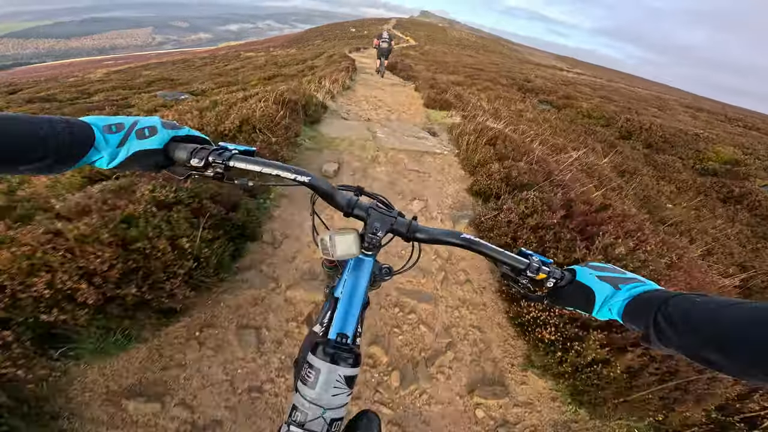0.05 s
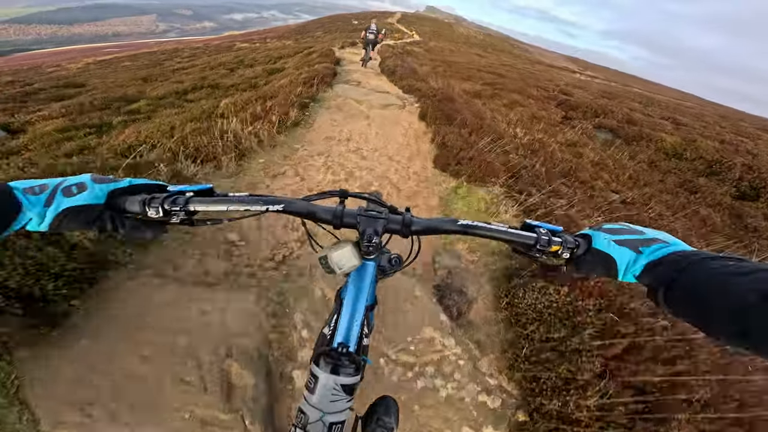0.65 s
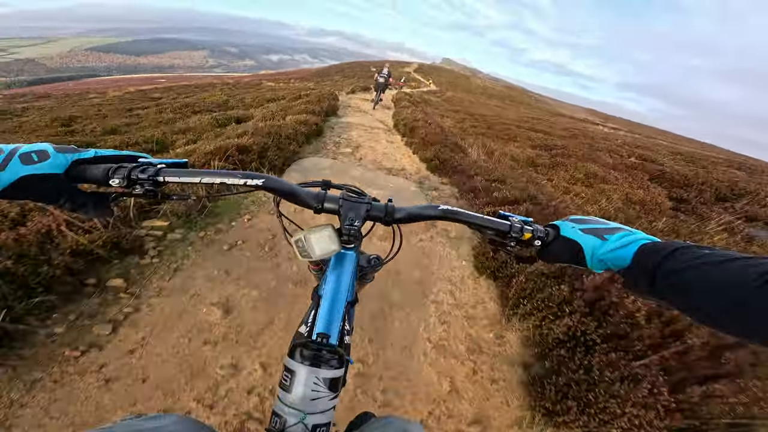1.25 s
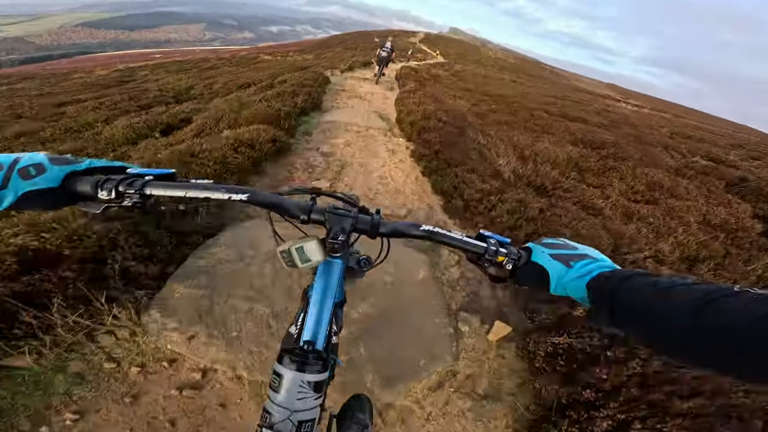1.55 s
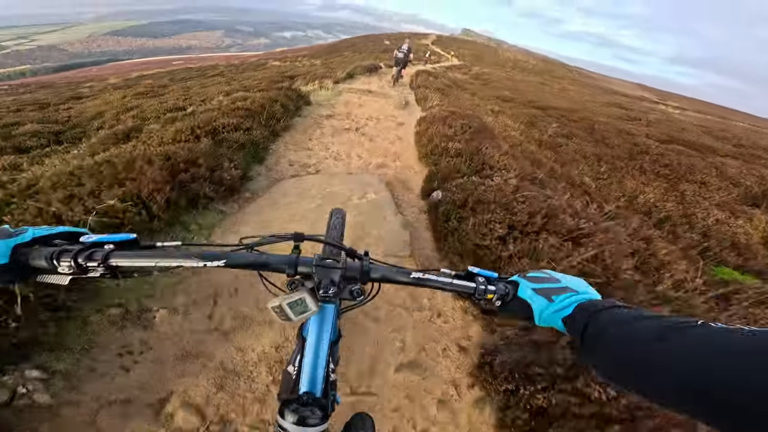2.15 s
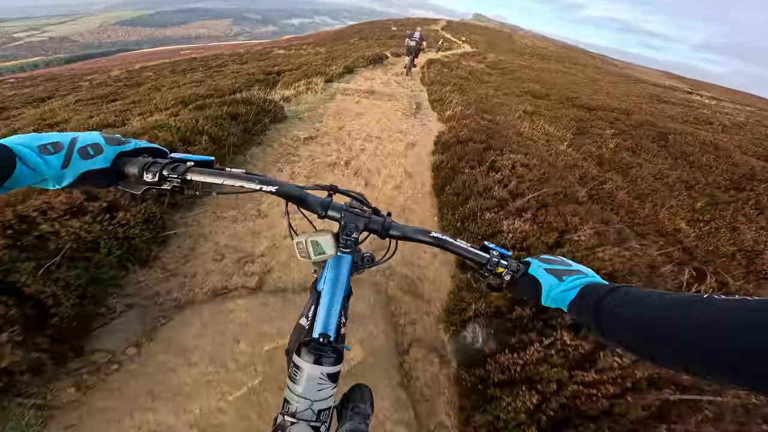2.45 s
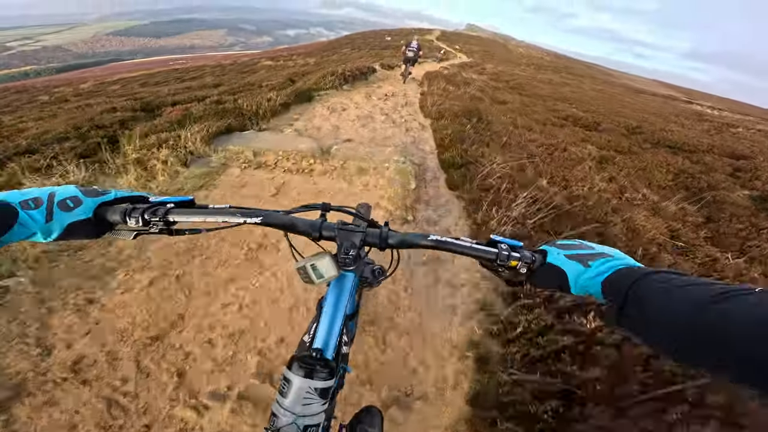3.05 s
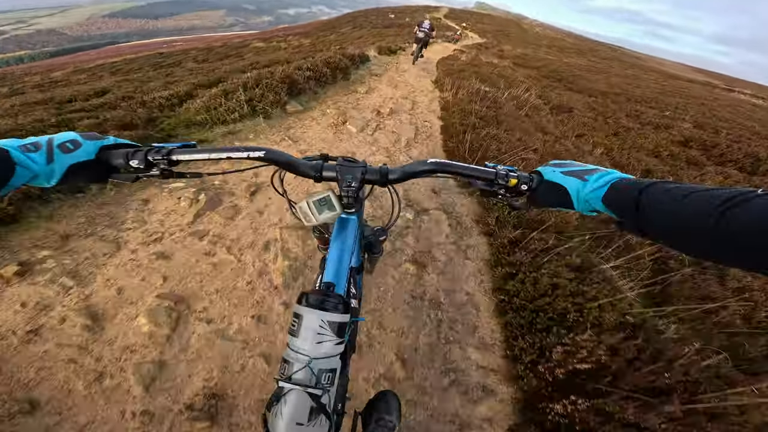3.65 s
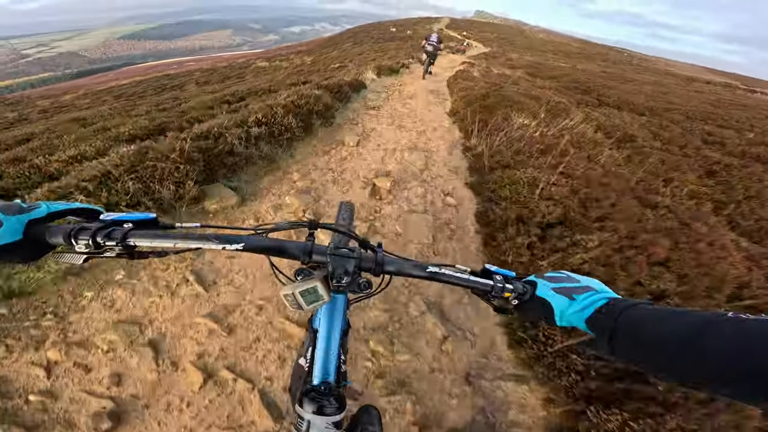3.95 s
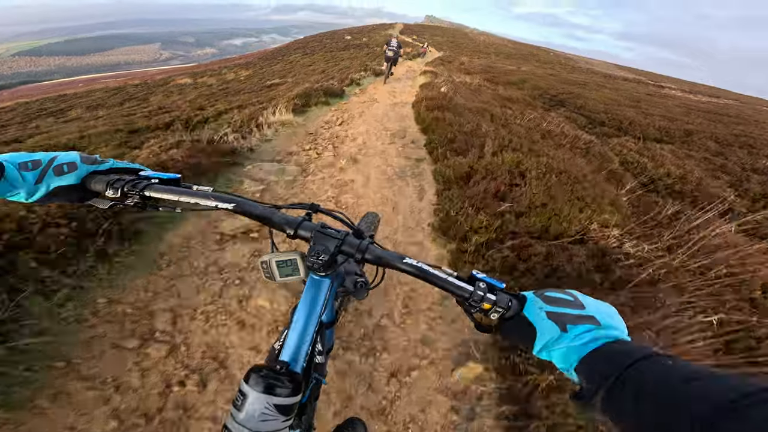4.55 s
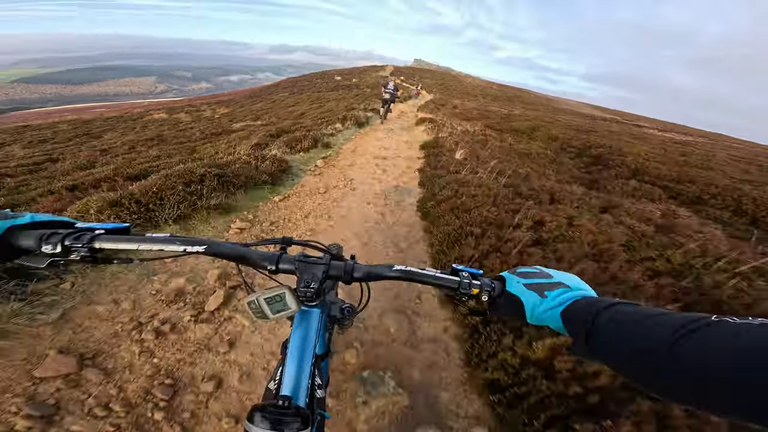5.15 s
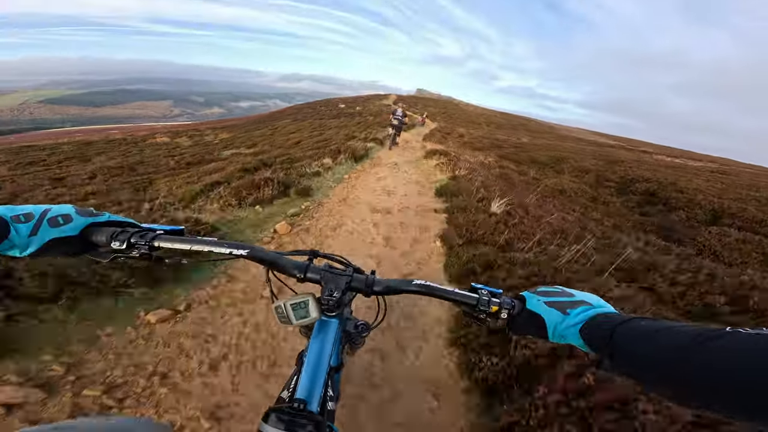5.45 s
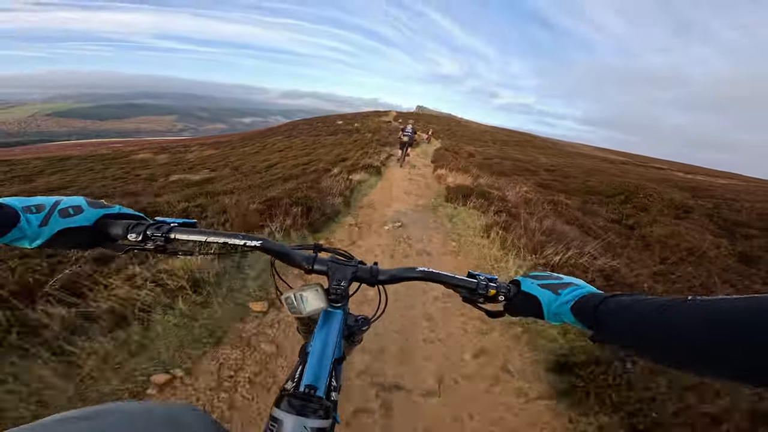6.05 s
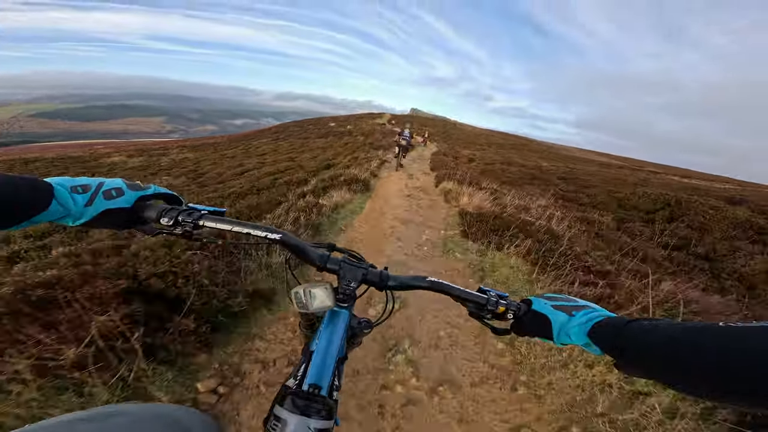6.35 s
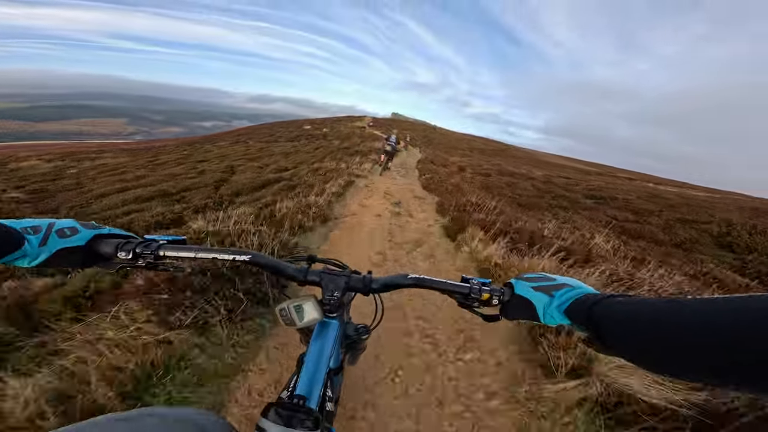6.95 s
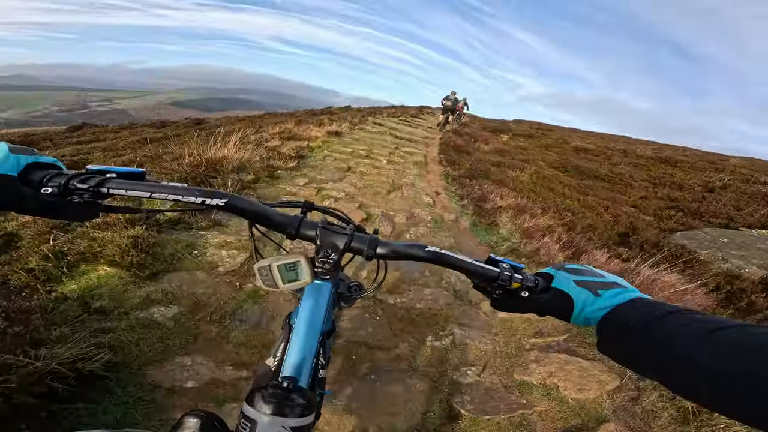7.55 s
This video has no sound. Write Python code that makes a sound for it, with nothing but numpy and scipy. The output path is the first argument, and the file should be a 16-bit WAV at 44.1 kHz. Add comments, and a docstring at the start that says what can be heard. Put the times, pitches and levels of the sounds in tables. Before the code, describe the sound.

Wind buffets the microphone as bicycle tyres roar over gravel and knock against rocks, the chain clattering and the freewheel buzzing near the end.

```python
"""A mountain bike rolls fast along a stony moorland trail, heard from the rider's chest.
Its tyres roar as the tread drums on the ground, and grit cracks beneath them, while turbulent
wind buffets the microphone. Impacts excite the bike's resonances: rocks knock against the wheels,
the chain clatters and cables rap the hollow frame. Near the end the freewheel's pawls buzz."""
import sys
import numpy as np
from scipy import signal
from scipy.fft import rfft, irfft, next_fast_len
from scipy.io import wavfile
from scipy.ndimage import uniform_filter1d

SR = 44100
rng = np.random.default_rng(int(sys.argv[2]) if len(sys.argv) > 2 else 0)


def dump_mix(stems):
    """Bounce the given channels to the path in sys.argv[1] as a 16-bit WAV at rate SR."""
    frames = np.atleast_2d(stems).T  # one column per channel
    limited = np.clip(frames, -1, 1)  # hard clip at full scale
    pcm = np.round(limited * 32767).astype(np.int16)
    wavfile.write(sys.argv[1], SR, pcm)


N = 343450
TIME = np.arange(N) / SR
HIT_SIZE = SR // 12
HIT_AGE = np.arange(HIT_SIZE) / SR
DIRT_ROAR_DB, DIRT_GRIT_DB = -39, -51

# stony stretches, levels over packed dirt: start_s, length_s, roar_db, grit_db
STONY_STRETCHES = [(0.0, 0.2, 7.5, 9.5), (0.251, 0.6, 4, 5.5), (0.885, 0.12, 5.5, 10),
                   (1.103, 0.08, 8, 12.5), (1.252, 0.23, 7, 4.5), (1.713, 0.23, 5, 11), (2.087, 0.13, 5, 7),
                   (2.472, 0.1, 1.5, 8.5), (2.613, 0.12, 6.5, 11), (2.861, 0.092, 9.5, 10),
                   (3.05, 0.08, 3, 3.5), (3.638, 0.05, 8, 7), (3.81, 0.12, 12.5, 11.5),
                   (4.012, 0.1, 5.5, 4.5), (4.241, 0.55, 6.5, 8), (4.84, 0.23, 5.5, 7.5),
                   (5.195, 0.25, 5, 3.5), (5.547, 0.35, 1.5, -10), (6.235, 0.08, 4.5, 5.5),
                   (6.359, 0.26, 7.5, 6.5), (7.291, 0.2, 1.5, 4.5), (7.547, 0.22, 3.5, 4)]
# resonances of the wheel and of the frame: pitch_hz, width_hz, gain_db
WHEEL_MODES = [(380, 230, -11), (514, 200, 1.5), (630, 140, 0), (963, 76, 10.5), (1243, 195, 8.5),
               (1617, 120, 6), (1890, 490, -1.5), (2930, 980, -2)]
FRAME_MODES = [(416, 95, 5), (520, 66, 8.5), (643, 37, 7.5), (960, 36, 6), (1220, 31, -1), (1540, 74, -1),
               (1800, 61, -15), (2770, 210, -1), (3000, 58, -12), (3460, 270, -10)]


def from_db(db):
    """Decibels to amplitude ratio."""
    return 10 ** (np.asarray(db) / 20)


def unit_power(x):
    """Normalise to a mean square of one."""
    return x / np.sqrt(np.mean(x ** 2) + 1e-20)


def steady(pair, span_s):
    """Hold a pair of noises at unit power over a sliding span."""
    return pair / np.sqrt(uniform_filter1d(pair ** 2, max(int(span_s * SR), 2)) + 1e-12)


def curves(rows):
    """Interpolate rows of (time_s, values...) at every sample."""
    times, *columns = np.transpose(rows)
    return [np.interp(TIME, times, column) for column in columns]


def swells(rows, rise_s, fall_s):
    """Upper envelope of trapezoids given as (start_s, length_s, height)."""
    return np.max([np.interp(TIME, [s - rise_s, s, s + length, s + length + fall_s], [0, top, top, 0])
                   for s, length, top in rows], axis=0)


def drift(corner_hz):
    """Low-passed noise of unit power: a smooth random fluctuation."""
    hop, settle = 40, 2000
    pole = np.exp(-2 * np.pi * corner_hz * hop / SR)
    noise = rng.standard_normal(N // hop + settle + 2)
    slow = signal.lfilter([1], [1, -2 * pole, pole * pole], noise)[settle:]
    return np.interp(np.arange(N) / hop, np.arange(len(slow)), unit_power(slow))


def colour(x, spectrum, power=1):
    """Minimum-phase filter whose gain is a spectrum of (frequency_hz, gain_db), raised to a power."""
    size = 2 ** 15
    hz, db = np.transpose(spectrum)
    grid_hz = np.maximum(np.arange(size // 2 + 1) * SR / size, 1)
    gain = from_db(power * np.interp(np.log(grid_hz), np.log(hz), db))
    cepstrum = irfft(np.log(gain))
    cepstrum[1:size // 2] *= 2  # folding the cepstrum makes the filter causal
    cepstrum[size // 2 + 1:] = 0
    response = irfft(np.exp(rfft(cepstrum)))[:size // 2]
    padded = next_fast_len(N + size // 2, real=True)
    return irfft(rfft(x, padded) * rfft(response, padded), padded)[..., :N]


def resonate(x, modes, scatter_db=0):
    """Modal superposition: damped resonances whose strengths vary with the point of contact."""
    out = 0
    for k, (hz, width, db) in enumerate(modes):
        r = np.exp(-np.pi * width / SR)
        band = signal.lfilter([1, 0, -1], [1, -2 * r * np.cos(2 * np.pi * hz / SR), r * r], x)
        gain = from_db(db + scatter_db * rng.standard_normal())
        out = out + (-1) ** k * (1 - r * r) * gain * band
    return out


def tuned(modes, hz):
    """Scale modes of (pitch_ratio, width_share, gain_db) to a pitch."""
    return [(ratio * hz, share * ratio * hz, db) for ratio, share, db in modes]


def soften(x, hz):
    """Compliance: rubber spreads a contact in time, acting as a low-pass filter."""
    return signal.sosfilt(signal.butter(2, hz, fs=SR, output="sos"), x)


def grains(per_s, spread_db):
    """Poisson impacts as a pair of click trains: many small stones, a few large."""
    at = np.flatnonzero(rng.random(N) < per_s / SR)
    sizes = from_db(spread_db * np.minimum(rng.exponential(1, (2, len(at))), 4))
    clicks = np.full((2, N), 1e-18)
    clicks[:, at] = sizes * rng.choice([-1, 1], sizes.shape)
    return clicks


def strike(modes, t60, crush, scatter_db):
    """Impact excitation: an impulse and a dying crush of contacts drive the modes; peak power is one."""
    contacts = rng.laplace(0, 1, (2, HIT_SIZE))
    force = crush * contacts * from_db(-60 * HIT_AGE / t60)
    force[:, 0] += [1, rng.choice([-1, 1])]
    sound = resonate(force + 1e-18, modes, scatter_db)
    power = uniform_filter1d(sound ** 2, size=66, mode="constant")
    return sound / np.sqrt(power.max(axis=1, keepdims=True))


def add(track, s, sound):
    """Superpose a sound on the track at s seconds."""
    at = int(s * SR)
    track[:, at:at + sound.shape[1]] += sound[:, :N - at]


def wind(gust_midpoint_db=-25, gust_range_db=14):
    """Turbulence: large eddies rumble; small ones break on the microphone ports in quick lumps."""
    # strength of the headwind's rumble: time_s, level_db
    headwind = [(0, -25.5), (0.6, -22), (1.25, -23), (1.9, -20.5), (2.5, -27.5), (2.72, -18), (3.15, -27),
                (3.65, -20), (4.7, -25), (5.0, -21.5), (5.35, -22), (6.0, -25.5), (6.4, -25.5),
                (7.2, -25.5), (7.45, -21), (7.79, -28.5)]
    # gusts over the light buffeting: start_s, length_s, rise_db
    gusts = [(0.07, 0.14, 11), (0.3, 0.29, 8), (0.405, 0.025, 11), (0.515, 0.03, 11.5), (0.78, 0.1, 6.5),
             (1.63, 0.057, 3.5), (2.08, 0.12, 6), (2.74, 0.15, 5.5), (3.12, 0.018, 6), (3.76, 0.12, 10.5),
             (4.19, 0.72, 4), (4.8, 0.31, 9.5), (5.72, 0.066, 5), (6.55, 0.21, 3.5), (7.32, 0.065, 8),
             (7.67, 0.03, 8.5)]
    # moments of stiller air: start_s, length_s
    lulls = [(1.188, 0.19), (1.99, 0.015), (5.438, 0.05), (5.953, 0.097), (7.09, 0.064)]
    # spectra of large eddies, light buffeting and strong gusts: frequency_hz, density_db
    rumble_spectrum = [(8, -25.5), (18, -2.5), (32, 2.5), (50, -4), (80, -3.5), (120, -20), (250, -64.5),
                       (600, -68)]
    light_spectrum = [(45, -26), (80, -2.5), (110, 0), (160, -3), (230, -7), (320, -9.5), (480, -18.5),
                      (800, -35.5), (2000, -72.5), (6000, -99)]
    gust_spectrum = [(60, -23.5), (105, 3), (150, -0.5), (240, -4), (330, -11.5), (480, -19), (800, -30.5),
                     (2000, -69.5), (6000, -69)]
    headwind_db, = curves(headwind)
    lull_db = -10 * swells([(s, length, 1) for s, length in lulls], rise_s=0.026, fall_s=0.026)
    rumble_db = headwind_db + .5 * lull_db + 2 * drift(5.1)
    light_db = -32.5 + 0.48 * (headwind_db - headwind_db.mean())
    buffet_db = light_db + swells(gusts, rise_s=0.097, fall_s=0.094) + lull_db + 1.5 * drift(15.6)
    rumble = steady(colour(rng.standard_normal((2, N)), rumble_spectrum), span_s=0.108)
    light_noise, gust_noise = rng.standard_normal((2, 2, N)) * from_db(drift(21))
    gust_share = np.clip(.5 + (buffet_db - gust_midpoint_db) / gust_range_db, .05, .95)
    light = np.sqrt(1 - gust_share) * unit_power(colour(light_noise, light_spectrum))
    strong = np.sqrt(gust_share) * unit_power(colour(gust_noise, gust_spectrum))
    buffet = steady(light + strong, span_s=0.11)
    return rumble * from_db(rumble_db - 0.5) + buffet * from_db(buffet_db - 0.6)


def ground(rise_s=0.087, fall_s=0.12):
    """Roughness and load set the levels of roar and grit: up on stony stretches, down in a hop."""
    # the tyres go light over a lip: start_s, length_s
    hops = [(1.52, 0.014), (2.34, 0.076)]
    stretches = np.array(STONY_STRETCHES)
    hop_db = -3.5 * swells([(s, length, 1) for s, length in hops], rise_s=0.016, fall_s=0.016)
    roar_db = DIRT_ROAR_DB + swells(stretches[:, [0, 1, 2]], rise_s, fall_s)
    grit_db = DIRT_GRIT_DB + swells(stretches[:, [0, 1, 3]], rise_s, fall_s)
    return roar_db + hop_db, grit_db + .5 * hop_db


def tyres(roar_db, grit_db):
    """Cavity resonance: the drumming tread rings the tyre's air, while grit cracks under it in clumps."""
    # spectra of the tyre and of crushed grit: frequency_hz, density_db
    roar_spectrum = [(100, -31), (200, 9.5), (255, 16), (310, 4), (440, 6.5), (620, 1), (830, -2),
                     (960, 1.5), (1090, -0.5), (1240, 0), (1450, -5.5), (2200, -12.5), (3400, -14.5),
                     (7000, -43)]
    grit_spectrum = [(900, -60), (1800, 2), (2450, -2), (2900, 0), (3450, -0.5), (4200, -4.5), (5200, -5),
                     (6000, -7.5), (7400, -6.5), (8200, -14.5), (9700, -15), (15000, -18)]
    bumps = drift(49)
    tread = unit_power(grains(per_s=2500, spread_db=3))
    roar = steady(colour(tread * from_db(2 * bumps), roar_spectrum), span_s=0.244)
    # loose, loud ground breaks up more unevenly than packed dirt
    looseness = np.clip((grit_db + 60.5) / 15, .2, 1.2)
    cracks = unit_power(crumble(grains(per_s=700, spread_db=4)))
    sand = rng.standard_normal((2, N))
    clumps = from_db(2 * looseness * (1.3 * bumps + 0.15 * drift(130)))
    crunch = unit_power(colour((cracks + sand) * clumps, grit_spectrum))
    ticking = pebbles(low_hz=1100, high_hz=7500, sizes=26, each_per_s=12, width_share=0.066)
    grit = crunch + from_db(-2.5) * looseness * ticking
    return roar * from_db(roar_db) + grit * from_db(grit_db)


def crumble(clicks, t60=0.006, snap_db=1.5):
    """Brittle fracture: each grain snaps, then crumbles in an exponentially decaying burst of noise."""
    fade = from_db(-120 / (t60 * SR))
    power = signal.lfilter([1 - fade], [1, -fade], clicks ** 2)
    return from_db(snap_db) * clicks + np.sqrt(power) * rng.standard_normal(clicks.shape)


def pebbles(low_hz, high_hz, sizes, each_per_s, width_share):
    """Natural frequency depends on size: small stones tick at random, each size at its own pitch."""
    out = 0
    for hz in np.geomspace(low_hz, high_hz, sizes):
        taps = grains(each_per_s, spread_db=2)
        out = out + resonate(taps, [(hz, width_share * hz, 0)]) / hz
    return unit_power(out)


def chips(grit_db):
    """Hard impacts ring high: sharp chips tick on the frame and rims, far more on loose ground."""
    ticking = pebbles(low_hz=3400, high_hz=9000, sizes=14, each_per_s=4, width_share=0.055)
    return ticking * from_db(DIRT_GRIT_DB - 24 + 2.3 * (grit_db - DIRT_GRIT_DB))


def jolts(level_db, spread_db, body_db, decay_s, count):
    """Roughness excitation: small random blows on stony ground, as (time_s, level_db, body_db, decay_s)."""
    start, length = np.transpose(STONY_STRETCHES)[:2]
    ends = np.cumsum(length)
    along = (np.arange(count) + rng.random(count)) / count * ends[-1]
    stretch = np.searchsorted(ends, along)
    times = np.clip(start[stretch] + ends[stretch] - along, 0, TIME[-1])
    strength, tone = np.clip(rng.standard_normal((count, 2)), -2, 2).T
    levels = np.interp(times, TIME, level_db) + spread_db * strength
    bodies = body_db + spread_db * (tone - .5 * strength)
    return [(*row, decay_s) for row in zip(times, levels, bodies)]


def chain_slaps(grit_db, ring_width_hz=170):
    """Impact ringing: links land in a bright burst and excite the frame; on stones the chain rattles."""
    # hard slaps: time_s, level_db, relative_ring_db, rattle_t60_s, ring_hz
    slaps = [(0.1332, -33, -9, 0.019, 3000), (0.185, -31, 1.5, 0.13, 3334), (0.736, -36, 5, 0.012, 3200),
             (0.755, -34.5, 1.5, 0.023, 2770), (1.106, -44.5, 24, 0.012, 2900),
             (1.152, -38, 12, 0.037, 3165), (1.4, -36, 10.5, 0.0061, 2620),
             (1.4205, -29, 7.5, 0.0082, 3020), (1.5875, -33.5, 6, 0.029, 2810),
             (1.5988, -37, 9, 0.0069, 3250), (1.7227, -28, -2.5, 0.0087, 3200),
             (1.8982, -31, -5, 0.015, 3000), (1.994, -37, -1, 0.012, 2970),
             (2.1033, -34.5, 12, 0.017, 2930), (2.1141, -30, 2, 0.12, 2900), (2.161, -25, 0, 0.02, 2740),
             (2.8673, -43, 23, 0.0085, 2900), (2.8935, -31, -5, 0.05, 2950), (2.9214, -29, 0, 0.016, 3060),
             (3.1413, -36.5, 3, 0.06, 3260), (3.1684, -37, -4, 0.011, 2930),
             (3.491, -34.5, -4, 0.017, 3220), (3.6597, -32.5, -1, 0.032, 3070),
             (3.7947, -39.5, 11, 0.023, 3080), (3.8562, -46, 20, 0.011, 2820),
             (3.8803, -29.5, 6.5, 0.032, 2940), (3.94, -28.5, -6, 0.023, 2970),
             (4.0471, -19, -9, 0.026, 3000), (4.0547, -22.5, -18, 0.012, 2950),
             (4.289, -30, 4.5, 0.02, 2820), (4.3407, -30, 3, 0.034, 2900), (4.389, -33, 0, 0.034, 2950),
             (4.444, -39, 11, 0.023, 2950), (4.4648, -30, 2, 0.016, 3100), (4.6423, -30.5, 1, 0.025, 2800),
             (4.71, -37, 4, 0.012, 3020), (4.7373, -32.5, -3, 0.027, 2970), (4.8433, -35, 3, 0.0057, 3420),
             (5.045, -34, 4, 0.09, 3230), (6.3935, -26.5, -7, 0.0038, 3180), (6.447, -35, 5.5, 0.011, 3350),
             (6.574, -37, 2, 0.027, 2980), (6.584, -33, 0, 0.017, 3370), (6.6, -36, 7, 0.01, 3450),
             (6.6185, -33.5, 5.5, 0.027, 3050)]
    # resonances of the chain: pitch_hz, width_hz, gain_db
    chain_modes = [(4310, 610, -4.5), (5050, 370, 2.5), (5900, 880, 0), (7330, 840, -1.5),
                   (9040, 670, -7.5), (9040, 990, -4.5), (12700, 4000, -17)]
    out = np.zeros((2, N))
    rattle = jolts(grit_db - 3.5, spread_db=1, body_db=12, decay_s=0.0075, count=70)
    # the frame's pitch varies with where the chain lands
    rattle = [(*row, 2786 * np.exp(0.27 * rng.standard_normal())) for row in rattle]
    for s, db, ring_db, t60, hz in list(slaps) + rattle:
        ring_modes = [(0.623 * hz, 2 * ring_width_hz, -9), (hz, ring_width_hz, 0),
                      (1.17 * hz, 2 * ring_width_hz, -9)]
        links = strike(chain_modes, t60, crush=.4, scatter_db=1.8)
        ring = soften(strike(ring_modes, t60, crush=.12, scatter_db=2), hz=5500)
        add(out, s, from_db(db) * (links + from_db(ring_db + 2) * ring))
    return out


def rock_knocks(roar_db):
    """Modal response: a rock cracks on the wheel and thumps the tyre; long contacts crush more gravel."""
    # rocks against tyre and rim: time_s, level_db, relative_thud_db, contact_s
    rocks = [(0.138, -32, 9, 0.01), (0.1726, -26.5, 9.5, 0.022), (0.5385, -35, 8, 0.05),
             (0.953, -26.5, 8, 0.036), (1.0925, -32.5, 19.5, 0.018), (1.0978, -20, 3, 0.027),
             (1.152, -30.5, 5, 0.031), (1.19, -34, 17, 0.03), (1.3325, -35.5, 15.5, 0.013),
             (1.4228, -31, 8, 0.051), (1.706, -23, -3, 0.025), (1.846, -23, -8, 0.016),
             (1.8849, -25, -6, 0.02), (1.985, -29, 3, 0.016), (2.0983, -25.5, 7, 0.058),
             (2.123, -30, -1, 0.045), (2.2787, -30, -4, 0.032), (2.532, -27.5, 4, 0.027),
             (2.7735, -29.5, 5, 0.033), (2.859, -22, 0, 0.016), (2.887, -30, 9, 0.048),
             (2.9132, -24.5, 8, 0.026), (3.0509, -25, -21, 0.007), (3.634, -26, 0, 0.019),
             (3.847, -23, -3, 0.04), (3.8784, -23, -6, 0.034), (3.9245, -19.5, -11, 0.047),
             (4.0549, -18.5, 5.5, 0.025), (4.2906, -25.5, 2, 0.014), (4.333, -22.5, 5, 0.035),
             (4.5188, -25, -11, 0.012), (4.7592, -18.5, -2, 0.011), (5.0442, -26, -5, 0.04),
             (6.3685, -34, 13.5, 0.014), (6.4893, -29, 8, 0.016), (6.5605, -33, -8, 0.012),
             (6.6176, -30.5, 14.5, 0.054), (6.732, -37.5, 12, 0.071), (7.5429, -28.5, -1, 0.027)]
    # resonances of the thumped tyre: pitch_hz, width_hz, gain_db
    thud_modes = [(162, 75, -22.5), (246, 28, 15), (395, 310, 16.5)]
    out = np.zeros((2, N))
    small_rocks = jolts(roar_db - 5.5, spread_db=1.5, body_db=6, decay_s=0.0057, count=28)
    for s, db, thud_db, contact_s in list(rocks) + small_rocks:
        t60 = 1.78 * contact_s
        crack = soften(strike(WHEEL_MODES, t60, crush=.12, scatter_db=2.5), hz=4200)
        thud = soften(strike(thud_modes, t60, crush=.05, scatter_db=3), hz=800)
        add(out, s, from_db(db) * (crack + from_db(thud_db - 1.5) * thud))
    return out


def frame_rattle(rise_s=0.012):
    """Forced vibration: after a landing, chattering cables and loose parts keep the tubes ringing."""
    # heavy landings: time_s, level_db, t60_s
    landings = [(0.175, -31, 0.25), (1.1, -30, 0.55), (1.85, -32, 0.31), (2.105, -28.5, 0.44),
                (2.868, -33, 0.35), (3.85, -33, 0.65), (4.335, -38, 0.28), (4.76, -32.5, 0.31),
                (6.62, -39, 0.2), (7.545, -41, 0.5)]
    shake = 0
    for s, db, t60 in landings:
        onset = np.clip((TIME - s) / rise_s + 1, 0, 1)
        shake = shake + onset * from_db(db - 60 * np.maximum(TIME - s, 0) / t60)
    chatter = grains(per_s=260, spread_db=3)
    return shake * steady(resonate(chatter, FRAME_MODES), span_s=0.035)


def clinks_and_bounces(width_share=0.18):
    """Free vibration: stones clink; near the end a few bouncing knocks ring the wheel at about 1230 Hz."""
    # stone clinks and bouncing knocks on the wheel: time_s, level_db, pitch_hz
    hits = [(0.376, -34, 3070), (0.42, -39, 3500), (0.44, -32, 3000), (0.483, -39, 3180),
            (0.509, -31.5, 1640), (0.602, -35, 3600), (0.625, -35, 2970), (0.677, -30, 2960),
            (0.692, -35, 2020), (0.777, -34, 3200), (0.882, -31, 2980), (1.6203, -29, 3550),
            (2.199, -42, 3800), (2.2222, -39, 3300), (2.253, -31.5, 2570), (2.411, -37, 2520),
            (2.6183, -32, 2400), (2.9596, -28.5, 3770), (4.214, -32, 2830), (4.261, -33, 3500),
            (4.881, -33.5, 3380), (4.965, -32, 3000), (5.119, -35, 2120), (5.2936, -37, 3460),
            (5.309, -37, 2300), (5.332, -31, 1700), (5.4498, -33, 2850), (5.501, -35.5, 2270),
            (5.531, -36.5, 2930), (5.64, -35, 3170), (6.057, -37, 2540), (6.181, -40, 2010),
            (6.2443, -33.5, 4700), (6.303, -37, 1980), (6.737, -36.5, 3270), (6.763, -37.5, 2200),
            (6.779, -37.5, 3230), (7.452, -35, 2720), (7.567, -27, 1230), (7.6, -33, 1230),
            (7.604, -39, 3700), (7.631, -33, 1220), (7.69, -35, 2900), (7.699, -32, 1270)]
    modes = [(ratio, width_share, db) for ratio, db in [(0.68, -3.5), (1, 0), (1.2, -4.5), (1.9, -17.5)]]
    out = np.zeros((2, N))
    for s, db, hz in hits:
        ring = strike(tuned(modes, hz), t60=0.034, crush=0.085, scatter_db=3.5)
        add(out, s, from_db(db + 1) * soften(ring, hz=6500))
    return out


def gravel_scrapes(edge_s=0.0034):
    """Stick-slip friction: countless tiny slips merge into a rasp at the pitch of the dragged stones."""
    # a tyre scuffs over rock: start_s, length_s, level_db, pitch_hz
    scuffs = [(0.536, 0.028, -27, 1460), (0.54, 0.024, -35, 2220), (1.118, 0.013, -36, 3000),
              (1.228, 0.01, -35.5, 3100), (1.256, 0.02, -34.5, 3060), (2.637, 0.054, -48, 3000),
              (2.785, 0.045, -39, 2120), (3.62, 0.061, -41, 2700), (6.362, 0.075, -43, 2450),
              (6.416, 0.014, -36, 3670)]
    # resonances of dragged gravel: pitch_ratio, width_share, gain_db
    gravel_modes = [(0.68, 0.53, -6), (1, 0.15, 1), (1.55, 0.54, -14)]
    out = np.zeros((2, N))
    for s, length, db, hz in scuffs:
        age = np.arange(int((length + edge_s) * SR)) / SR
        slips = rng.laplace(0, 1, (2, len(age)))
        rasp = steady(resonate(slips, tuned(gravel_modes, hz)), span_s=0.0092)
        envelope = np.clip(np.minimum(age, age[-1] - age) / edge_s, 0, 1)
        add(out, s, from_db(db) * rasp * envelope)
    return out


def cable_raps(fall_s=0.000665, rise_s=0.001):
    """Dispersion: high bending waves outrun low ones along a tube, so each rap is a falling 'tock'."""
    # cables and loose parts hit the hollow frame: time_s, level_db, starting_pitch_hz, t60_s
    raps = [(1.098, -25, 3040, 0.025), (1.1305, -29, 2600, 0.014), (1.1553, -22, 3440, 0.015),
            (1.164, -23, 1460, 0.029), (1.744, -25, 2160, 0.021), (2.087, -26.5, 2600, 0.019),
            (2.1138, -27, 3000, 0.01), (2.1387, -17, 1870, 0.02), (2.5182, -35, 2400, 0.016),
            (2.7283, -27, 2400, 0.014), (2.7735, -29.5, 2620, 0.013), (2.863, -20, 2330, 0.023),
            (2.8845, -22, 2020, 0.018), (2.9635, -30, 2200, 0.012), (3.0645, -31, 2020, 0.016),
            (3.3967, -28, 2400, 0.016), (3.8098, -26, 3230, 0.013), (3.8488, -22, 2770, 0.016),
            (3.8975, -29, 2970, 0.009), (3.925, -21, 2670, 0.0094), (4.069, -24.5, 2380, 0.018),
            (4.165, -16.5, 2530, 0.032), (4.3305, -21.5, 1930, 0.017), (4.402, -18, 2630, 0.035),
            (4.4893, -32, 2200, 0.015), (4.583, -29, 2220, 0.014), (4.7085, -30, 2780, 0.012),
            (5.0193, -27.5, 2200, 0.021), (6.304, -27, 3200, 0.028), (6.4898, -20.5, 3060, 0.012),
            (6.5605, -24.5, 2700, 0.01), (7.5421, -23, 2240, 0.03)]
    out = np.zeros((2, N))
    for s, db, hz, t60 in raps:
        envelope = (1 - np.exp(-HIT_AGE / rise_s)) * from_db(-60 * HIT_AGE / t60)
        cycles = hz * fall_s * np.log1p(HIT_AGE / fall_s)
        tock = np.sqrt(2) * envelope / envelope.max() * np.sin(2 * np.pi * cycles)
        crack = soften(strike(WHEEL_MODES, t60, crush=.03, scatter_db=2.5), hz=4200)
        tube_ring = strike(FRAME_MODES[:6], t60, crush=.03, scatter_db=3)
        polarity = np.array([[1], [rng.choice([-1, 1])]])
        add(out, s, from_db(db) * (polarity * tock + from_db(-9) * (crack + tube_ring)))
    return out


def link_ticks():
    """A brief contact excites high modes: steel on steel gives a very short, bright ring."""
    # one chain link taps hard metal: time_s, level_db, pitch_hz
    taps = [(1.115, -28, 7300), (1.143, -24.5, 6800), (1.4, -25.5, 7400), (1.598, -26.5, 6940),
            (2.1143, -28, 8000), (2.8833, -21, 8100), (2.934, -32, 7600), (2.967, -38, 7800),
            (3.8626, -25.5, 8000), (4.048, -22, 5400), (4.055, -28, 7400), (4.092, -38, 7200),
            (4.165, -36, 5500), (4.294, -29, 7600), (4.464, -28, 7700), (5.31, -41, 7500),
            (5.385, -43, 6400), (5.6185, -34.5, 7100), (5.6213, -31.5, 4940), (6.6277, -24, 7640),
            (7.625, -38, 8300), (7.762, -40, 4730)]
    # resonances of a link: pitch_ratio, width_share, gain_db
    link_modes = [(0.42, 0.2, -0.5), (0.7, 0.1, -1.5), (1, 0.084, 2), (1.22, 0.12, -5.5), (1.65, 0.35, -13)]
    out = np.zeros((2, N))
    for s, db, hz in taps:
        add(out, s, from_db(db) * strike(tuned(link_modes, hz), t60=0.012, crush=.15, scatter_db=1.5))
    return out


def freewheel(rate_jitter=0.004, uneven_db=3, flutter_db=2):
    """An impulse train: pawls snap over the ratchet and ring the hub, wavering with the jolting wheel."""
    # coasting: time_s, clicks_per_s, level_db, relative_shell_db
    coasting = [(7.225, 690, -52, -4), (7.262, 712, -43, -4), (7.29, 706, -42, -6), (7.312, 674, -46.5, 8),
                (7.372, 700, -41, -2), (7.41, 685, -42, -14), (7.44, 660, -48, -6), (7.51, 705, -39, -3),
                (7.55, 690, -46, -2), (7.605, 660, -45, 3), (7.655, 625, -45, 4), (7.688, 582, -47, -6),
                (7.712, 572, -53, 0), (7.728, 580, -44.5, 13), (7.75, 585, -48, 5), (7.77, 615, -44, 7),
                (7.79, 590, -56, -4)]
    # resonances of the hub and of its shell: pitch_hz, width_hz, gain_db
    hub_modes = [(1660, 110, 5), (2060, 170, -1), (2830, 320, 2.5), (3330, 300, 0), (3970, 1300, -9),
                 (6940, 2700, -20)]
    shell_modes = [(1150, 97, 8.5), (1374, 160, -2.5)]
    clicks_per_s, db, shell_db = curves(coasting)
    teeth = np.cumsum(clicks_per_s * (1 + rate_jitter * drift(40))) / SR
    # play in the pawls makes each snap a little early or late: a rasp
    teeth = np.maximum.accumulate(teeth + .036 * drift(250))
    snaps = np.diff(np.floor(teeth), prepend=0) * from_db(uneven_db * rng.standard_normal((2, N)))
    buzz = steady(resonate(snaps, hub_modes), span_s=0.034) * from_db(flutter_db * drift(68))
    shell = steady(resonate(snaps, shell_modes), span_s=0.023)
    is_coasting = TIME >= coasting[0][0]
    return is_coasting * from_db(db) * (buzz + from_db(shell_db) * shell)


def reflections(x, level_db, t60, rise_s=0.00033):
    """Early reflections from the frame, the ground and the rider give each contact a short tail."""
    envelope = from_db(-60 * HIT_AGE / t60) * np.clip(HIT_AGE / rise_s, 0, 1)
    tail = rng.standard_normal((2, HIT_SIZE)) * envelope
    tail *= from_db(level_db) / np.sqrt(np.sum(tail ** 2, axis=1, keepdims=True))
    reflected = signal.fftconvolve(x, tail, axes=1)[:, :N]
    return (x + reflected) / np.sqrt(1 + from_db(2 * level_db))


def ports(pair, lean, unshared, phase):
    """Partial coherence: the first of a pair reaches both microphone ports, the second sets them apart."""
    shared, apart = pair[0], colour(pair[1], unshared)
    left = colour(shared + apart, lean, power=0.44)
    right = colour(shared - apart, lean, power=-0.51)
    size = next_fast_len(N + SR // 10, real=True)
    lead_rad = np.interp(np.fft.rfftfreq(size, 1 / SR), *np.transpose(phase))
    right = irfft(rfft(right, size) * np.exp(-1j * lead_rad), size)[:N]
    return np.array([left, right])


def scene():
    """Superposition on an open moor: no far echoes, only the bike below and air striking from the left."""
    # level bias between the ports: frequency_hz, leftward_db
    wind_lean = [(30, 5.5), (70, 2.4), (140, 8), (400, 6.3), (1500, 14)]
    bike_lean = [(60, 18), (300, -3.5), (700, -4), (1000, -0.5), (1250, 1.5), (1600, 0), (3300, 0),
                 (8000, -2), (15000, -6.5)]
    # sound the ports do not share: frequency_hz, gain_db
    wind_unshared = [(30, -8), (70, -16.5), (150, -14.5), (400, -11)]
    bike_unshared = [(100, -41), (500, -25), (1000, -18.5), (1400, -8.5), (3100, -12), (7000, -10.5),
                     (14000, -2)]
    # phase between the ports: frequency_hz, left_lead_rad
    wind_phase = [(20, 0.36), (90, -0.11), (180, -0.57), (400, -0.56), (1500, 0.083)]
    bike_phase = [(100, 0.062), (500, 0.095), (860, 0.55), (2700, 0.65), (3400, 1), (5000, 0.79),
                  (15000, 0.22)]
    # the bike swings under the rider: time_s, left_minus_right_db
    sway = [(0, 1.5), (3.3, 2), (5.25, 1.6), (5.8, -1.5), (6.3, 1.5), (7.2, 0.5), (7.79, 1.5)]
    air = ports(wind(), wind_lean, wind_unshared, wind_phase)
    roar_db, grit_db = ground()
    clatter = chain_slaps(grit_db) + link_ticks() + clinks_and_bounces() + chips(grit_db)
    clatter = reflections(clatter, level_db=-7.5, t60=0.05)
    rolling = tyres(roar_db, grit_db) + freewheel() + gravel_scrapes()
    blows = rock_knocks(roar_db) + cable_raps() + frame_rattle()
    bike = ports(rolling + blows + clatter, bike_lean, bike_unshared, bike_phase)
    sway_db, = curves(sway)
    return bike * from_db([sway_db / 2, -sway_db / 2]) + air


def record(dry, cutoff_hz=15800):
    """Transmission loss: the sealed microphone dulls the top octave; the highest treble is cut."""
    # response of the sealed microphone: frequency_hz, gain_db
    mic_response = [(20, 1), (7700, -0.5), (8100, 0.5), (9600, 1), (10300, -5), (11200, -13.5),
                    (14000, -19), (15800, -24)]
    low_pass = signal.ellip(10, .1, 90, cutoff_hz, fs=SR, output="sos")
    return signal.sosfilt(low_pass, colour(dry, mic_response))


dry = scene()
out = record(dry)
dump_mix(out)
```